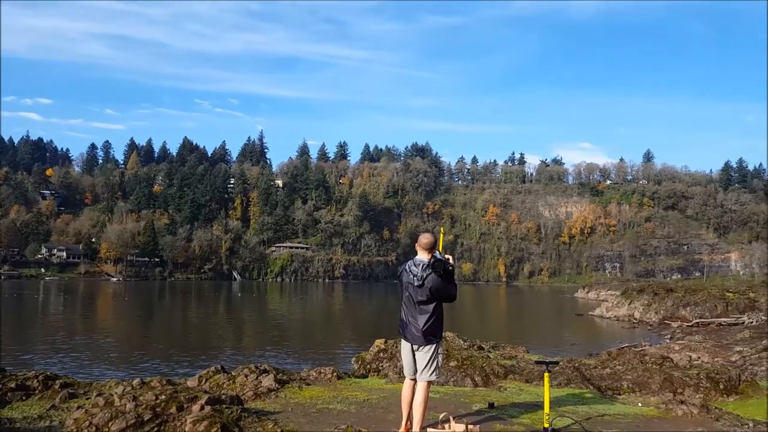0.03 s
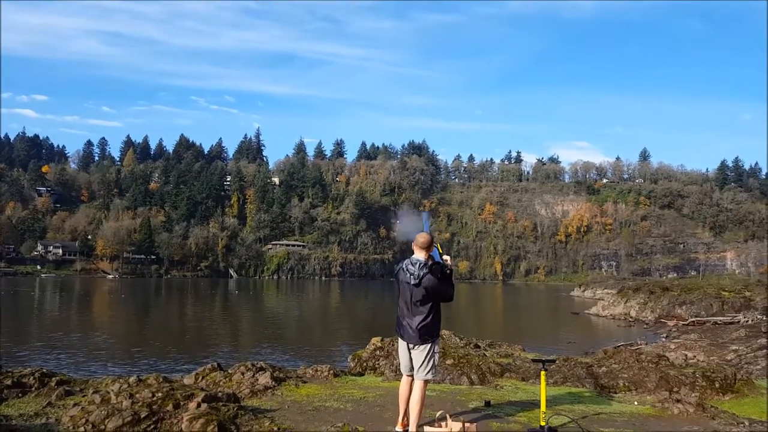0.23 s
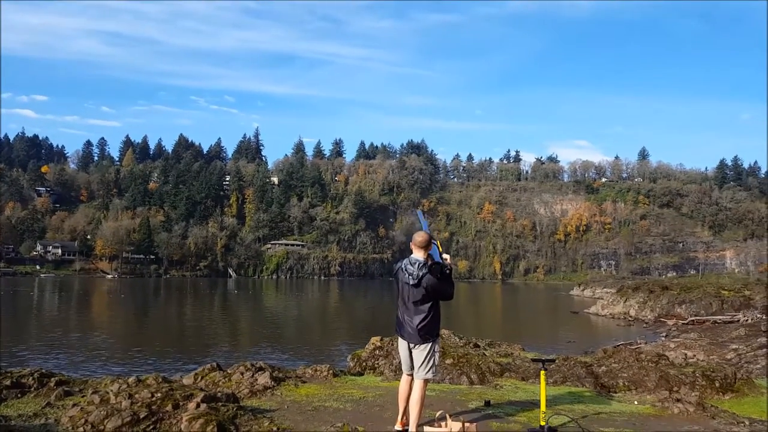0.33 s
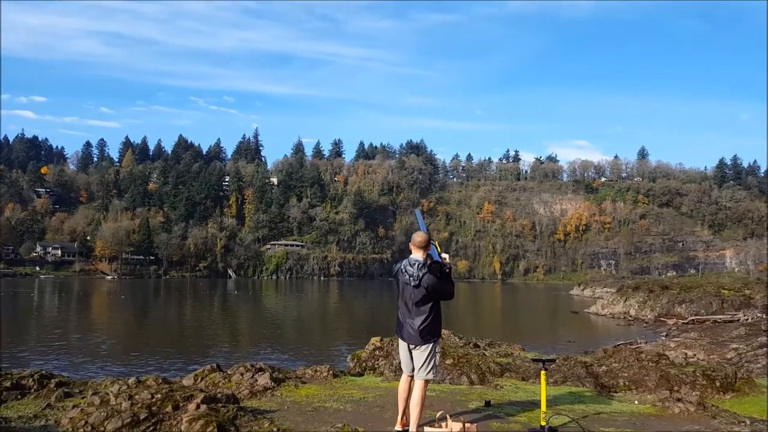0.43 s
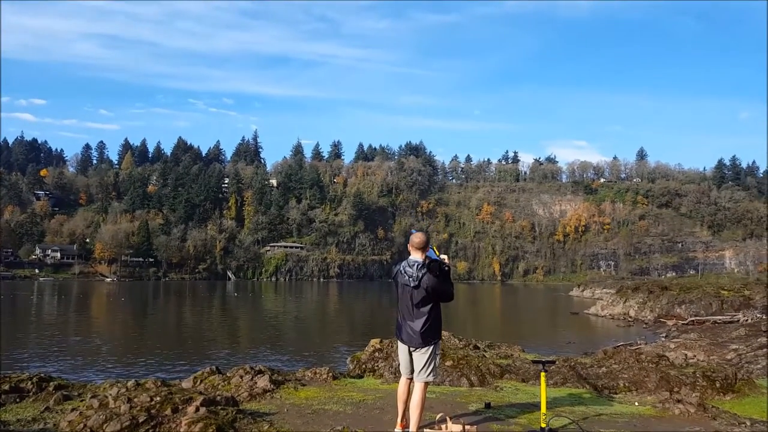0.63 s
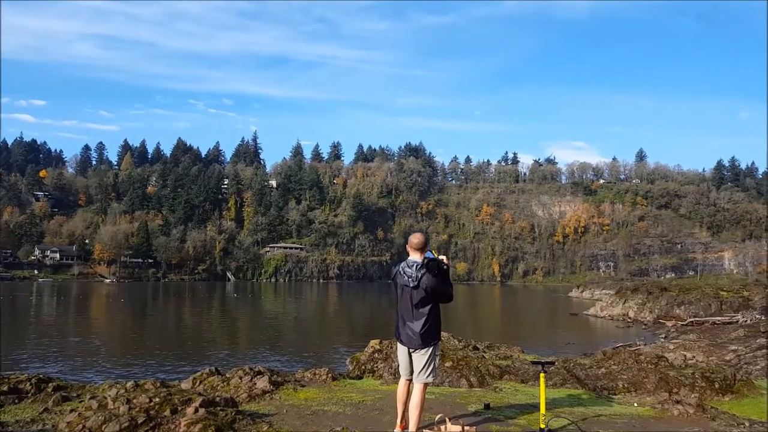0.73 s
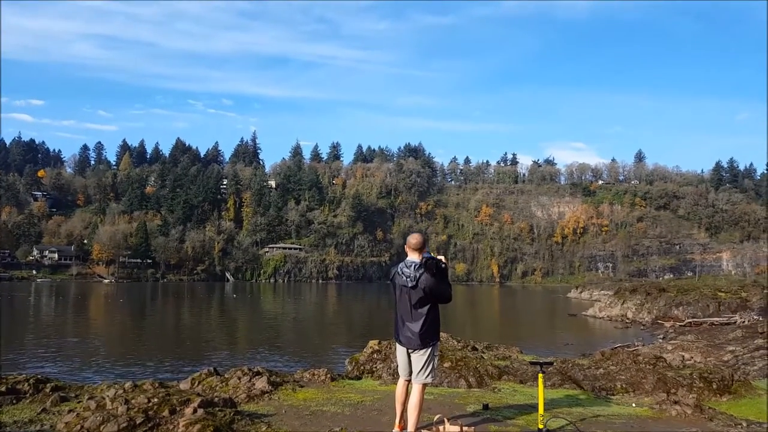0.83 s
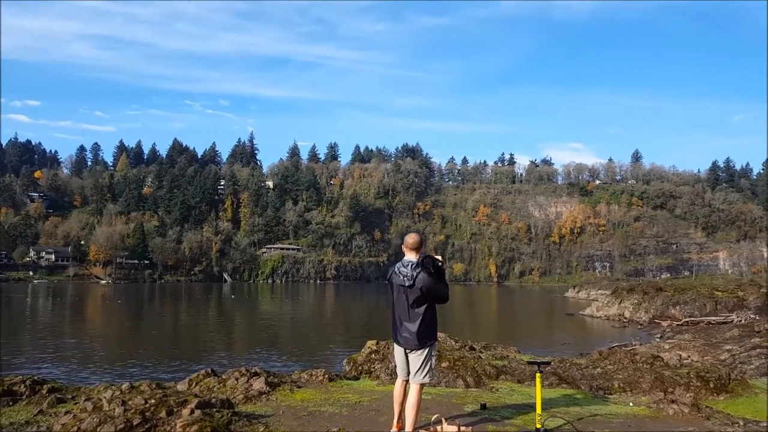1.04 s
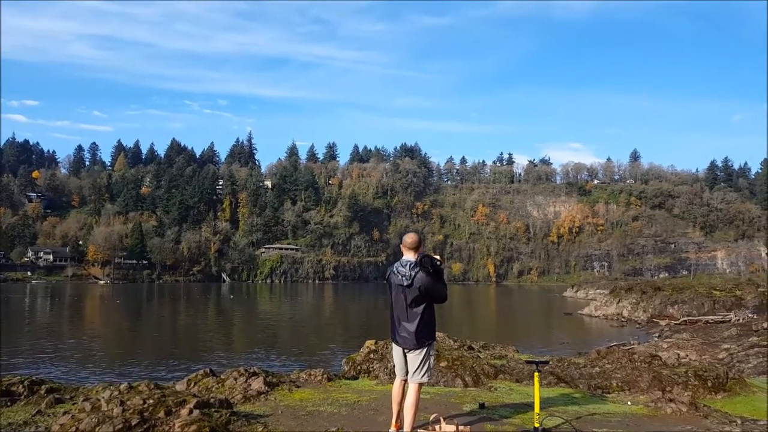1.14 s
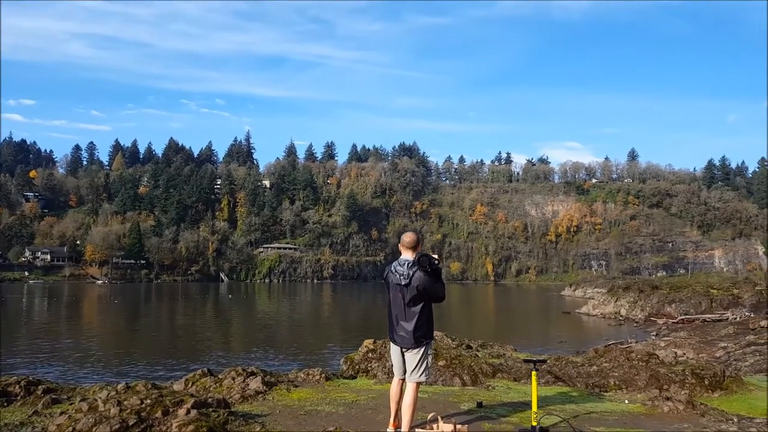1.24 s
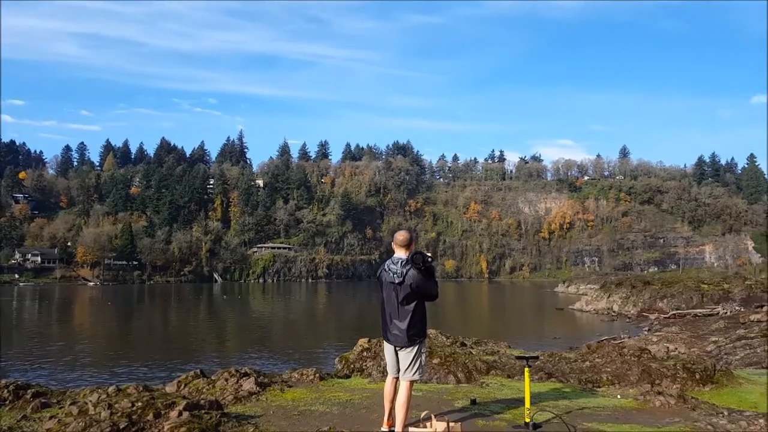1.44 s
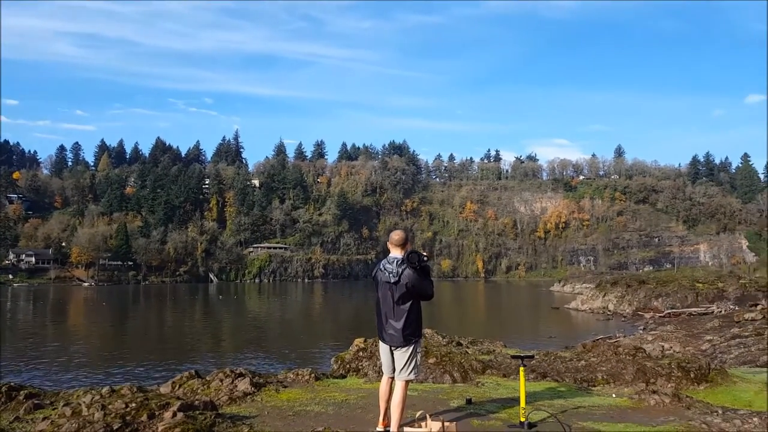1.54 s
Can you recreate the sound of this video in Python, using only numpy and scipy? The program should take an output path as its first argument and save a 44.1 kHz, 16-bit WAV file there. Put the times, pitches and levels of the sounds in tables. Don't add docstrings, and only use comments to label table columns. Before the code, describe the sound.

A compressed-air cannon fires a few metres away on a riverbank: plastic valve clack, tiny rising hiss, loud hollow pop and air surge, then tree echoes and a late woody knock from the far bank, phone microphone.

```python
import sys
import numpy as np
from scipy import signal
from scipy.fft import rfft, irfft
from scipy.io import wavfile
from scipy.ndimage import uniform_filter1d

SR = 44100
rng = np.random.default_rng(int(sys.argv[2]) if len(sys.argv) > 2 else 0)


def int16_out(signal):
    q = np.round(np.clip(np.atleast_2d(signal).T, -1, 1) * 32767)
    wavfile.write(sys.argv[1], SR, q.astype(np.int16))


def decibels_to_gain(level_db):
    exponent = np.asarray(level_db, float) / 20
    return 10 ** exponent


N = 70560
t = np.arange(N) / SR
POP_S = 0.2555


def level(x, db):
    return x * decibels_to_gain(db) / np.sqrt(np.mean(x ** 2))


def noise():
    return rng.standard_normal(N)


def colour(x, table, scale=1):
    hz, db = np.array(table, float).T
    size = 4096
    bins_hz = np.arange(size // 2 + 1) * SR / size
    bins_db = np.interp(np.log(bins_hz + 1), np.log(hz + 1), db)
    cepstrum = irfft(np.log(decibels_to_gain(scale * bins_db)))
    cepstrum[1:size // 2] *= 2
    cepstrum[size // 2 + 1:] = 0
    impulse = irfft(np.exp(rfft(cepstrum)))
    return signal.fftconvolve(np.r_[x[-size:], x], impulse)[size:size + N]


def ring(x, hz, width_hz):
    lead = 4096
    b, a = signal.iirpeak(min(hz, 0.45 * SR), hz / max(width_hz, 5), SR)
    return signal.lfilter(b, a, np.r_[x[-lead:], x])[lead:]


def ring_twice(x, hz, width_hz):
    return ring(ring(x, hz, width_hz), hz, width_hz)


def body(x, peaks, flip=-1):
    return sum(flip ** k * decibels_to_gain(db) * ring(x, hz, w) for k, (hz, w, db) in enumerate(peaks))


def swell(peak_s, rise_s, fall_s):
    return np.exp(np.where(t < peak_s, (t - peak_s) / rise_s, (peak_s - t) / fall_s))


def pulse(peak_s, width_s):
    return np.exp(-((t - peak_s) / width_s) ** 2)


def walk(rate_hz):
    k = int(SR / rate_hz)
    steps = np.repeat(rng.standard_normal(N // k + 1), k)
    return 1.146 * uniform_filter1d(uniform_filter1d(steps, k), k)[:N]


# f/Hz, level/dB per Hz
AIR_SPECTRUM = [(25, -19.5), (75, 1), (200, -6), (420, -18.5), (800, -22.5), (1300, -24), (2700, -32),
                (4400, -49.5), (12000, -58.5)]
# f/Hz, width/Hz, level/dB
AIR_DRONES = [(655, 45, -59), (12000, 150, -94)]


def air():
    gust_db, flicker_db = 0.6, 3.5
    gust = walk(0.86)
    base = colour(noise(), AIR_SPECTRUM)
    wind = 0
    for hz in 30 * 2 ** np.arange(0, 9.1, 0.5):
        flicker = walk(12.24) * (hz / 100) ** -0.2
        wind = wind + ring(base, hz, hz / 2.1) * decibels_to_gain(gust_db * gust + flicker_db * flicker)
    out = level(wind, -45)
    for hz, width_hz, db in AIR_DRONES:
        out = out + level(ring(noise(), hz, width_hz) * decibels_to_gain(1.5 * walk(5.74)), db)
    return out


def far(x):
    return signal.sosfilt(signal.butter(8, 4600, fs=SR, output="sos"), x)


# f/Hz, width/Hz, level/dB
SLAP_MODES = [(674, 88, -0.5), (1035, 38, 8), (1400, 150, -2.5), (2040, 240, -8.5), (2630, 37, -4),
              (3070, 83, -9), (3650, 63, -10), (4160, 110, -19.5)]


def slap():
    slap_s, gap_s, knock_width_s = 1.2725, 0.0032, 0.00004
    knocks = pulse(slap_s, knock_width_s) + pulse(slap_s + gap_s, knock_width_s)
    haze = decibels_to_gain(-19) * noise() * swell(slap_s, rise_s=0.0025, fall_s=0.005)
    out = far(body(knocks + haze, SLAP_MODES))
    return out * decibels_to_gain(-26.5) / np.abs(out).max()


def bank_wash():
    wash = level(ring(ring(noise(), 1020, 180), 1020, 680), -49)
    return wash * swell(1.33, rise_s=0.037, fall_s=0.44 / np.log(1000))


# f/Hz, level/dB per Hz
TAIL_SPECTRUM = [(88, -29.5), (150, -12), (209, 0.5), (285, -14.5), (860, -12), (1130, -19), (2500, -16.5),
                 (2920, -23.5), (15500, -39.5)]


def tree_tail():
    low_t60_s, treble_t60_s, top_t60_s = 1.29, 1.485, 0.84
    scatter = level(colour(noise() * decibels_to_gain(1.8 * walk(70)), TAIL_SPECTRUM), -29)

    def below(hz):
        return signal.sosfiltfilt(signal.butter(2, hz, fs=SR, output="sos"), scatter)

    def fade(t60_s):
        return swell(POP_S, 0.0015, t60_s / np.log(1000))

    low, mid = below(4000), below(9500)
    return low * fade(low_t60_s) + (mid - low) * fade(treble_t60_s) + (scatter - mid) * fade(top_t60_s)


# t/s, level/dB, f/Hz, width/Hz, smear/s
LONE_ECHOES = [(0.371, -38.5, 2420, 1520, .012), (0.47, -39, 2430, 618, 0.023),
               (0.472, -34.5, 205, 155, 0.035), (0.494, -46, 2460, 500, 0.021),
               (0.582, -40.5, 2130, 1210, 0.013), (.665, -44, 400, 296, 0.01),
               (.835, -62, 8000, 8000, 0.018), (1.101, -52, 2850, 2380, .005),
               (1.118, -54, 2300, 2000, .005), (1.165, -59.5, 2450, 1480, 0.041),
               (.465, -56.5, 9000, 9000, .02), (1.31, -60, 2780, 2930, 0.065),
               (1.394, -45, 1000, 706, 0.0062)]


def lone_echoes():
    far_s = 1.05
    out = 0
    for s, db, hz, width_hz, smear_s in LONE_ECHOES:
        echo = ring_twice(noise(), hz, width_hz)
        if s > far_s:
            echo = far(echo)
        out = out + level(echo, db) * swell(s, smear_s / 5, smear_s)
    return out


# f/Hz, width/Hz, level/dB
VALVE_MODES = [(292, 120, 2), (540, 200, -9), (780, 200, -5.5), (1000, 100, -9), (1270, 120, -0.5),
               (1283, 220, 4.5), (1897, 110, 2), (2430, 230, -2), (2980, 220, -1.5), (4200, 250, -9),
               (5400, 640, -14)]


def valve():
    valve_s = 0.1963
    rattle = level(body(noise() * decibels_to_gain(1.8 * walk(1500)), VALVE_MODES), -18.5)
    tick = level(ring(noise(), 10000, 9000), -33)
    return rattle * swell(valve_s, 0.0004, 0.013) + tick * swell(valve_s, 0.00037, 0.0015)


# f/Hz, level/dB per Hz
HISS_SPECTRUM = [(1470, -24), (2500, -1.5), (6740, 5), (9370, 2.5), (10100, -25.5), (13000, -11),
                 (15500, -21)]


def hiss():
    start_s, stop_s = 0.205, 0.241
    start_hz, stop_hz = 4026, 8940
    run = np.clip((t - start_s) / (stop_s - start_s), 0, 1)
    hz = start_hz + (stop_hz - start_hz) * run
    squeal = level(ring(noise(), 300, 900) * np.sin(2 * np.pi * np.cumsum(hz) / SR), -46.5)
    leak = level(colour(noise(), HISS_SPECTRUM), -31.5)
    return (leak + squeal) * run ** 0.9 * swell(stop_s, np.inf, 0.0062)


def spray():
    jet = level(ring(noise(), 8000, 9200), -29) * swell(POP_S, 0.00025, 0.018)
    shove = level(ring_twice(noise(), 76, 47), -25.5)
    return jet + shove * pulse(POP_S + 0.02, 0.055)


# f/Hz, level/dB per Hz
GUSH_SPECTRUM = [(24, -25), (40, -15), (417, -5.5), (591, -13), (686, -5), (2010, -13), (2640, -9.5),
                 (3470, -17), (15500, -51.5)]


def gush():
    opened = np.clip((t - 0.214) / 0.0033, 0, 1)
    rough = level(colour(noise(), GUSH_SPECTRUM) * decibels_to_gain(2.3 * walk(250)), -17)
    thump = level(ring(noise(), 216.7, 128), -23.5)
    return opened * (rough * swell(POP_S, 0.015, 0.033) + thump * swell(POP_S, 0.055, 0.079))


# f/Hz, width/Hz, level/dB
BARREL_MODES = [(200, 54, -21.5), (450, 110, -7), (645, 84, -10.5), (1000, 93, -4), (1257, 280, -14.5),
                (1715, 250, -6.5), (2270, 430, -6.5), (2620, 200, -3), (3030, 83, -23.5), (4120, 240, -4),
                (8870, 600, -26.5)]
# t/s, level/dB, crack/dB
MUZZLE_FRONTS = [(.2547, -5, -24), (.2559, -1, -12), (.2579, -6, -18), (.2609, -3, -24), (.2677, -8, -20),
                 (.2699, -11, -20), (.2762, -9, -22), (.2787, -12, -26), (.2960, -18, -24)]


def muzzle():
    front_s, step_s, crack_fall_s = 0.00024, 0.0001, 0.00067
    steps, waves, cracks = 0, 0, 0
    for s, db, crack_db in MUZZLE_FRONTS:
        u = (t - s) / front_s - 0.7
        steps = steps + decibels_to_gain(db) * pulse(s, step_s)
        waves = waves - 1.36 * decibels_to_gain(db) * u * np.exp(-u ** 2)
        cracks = cracks + decibels_to_gain(db + crack_db) * swell(s, 0.0001, crack_fall_s)
    unit = np.abs(body(pulse(POP_S, step_s), BARREL_MODES, 0.85)).max()
    ringing = decibels_to_gain(-3) * body(steps, BARREL_MODES, 0.96) / unit
    crack = level(ring(ring(noise(), 8000, 6570), 8000, 6574), 0) * cracks
    return waves + ringing + crack


def bank():
    background = air() + slap() + bank_wash() + tree_tail() + lone_echoes()
    return background + valve() + hiss() + spray() + gush() + muzzle()


# f/Hz, level/dB
SIDE_OVER_MID = [(25, -19), (200, -16), (500, -13), (1000, -12), (2000, -3), (4400, 1), (8000, 0),
                 (15000, 1)]
# f/Hz, level/dB
LEFT_OVER_RIGHT = [(60, -0.5), (300, -2), (700, 0.5), (1300, -1), (2400, -8.5), (4400, -1.5), (8000, -3.5),
                   (15000, -0.5)]


def scene():
    port_lag_s = 0.0003
    mid = bank()
    side = colour(np.roll(bank(), int(port_lag_s * SR)), SIDE_OVER_MID)
    left = colour(mid, LEFT_OVER_RIGHT, 0.59) + side
    right = colour(mid, LEFT_OVER_RIGHT, -0.64) - side
    return np.array([left, right])


def roll_off(x):
    return signal.sosfilt(signal.butter(12, 15950, fs=SR, output="sos"), x)


def record(dry):
    lag_s, attack_s, hold_s = 0.04, 0.037, 0.47
    duck_db, recover_db_per_s = -9, 19
    ceiling, top_hz = 1.05, 15950
    since_s = t - t[np.abs(dry).max(0).argmax()] - lag_s
    ducked_db = duck_db * np.clip(since_s / attack_s, 0, 1)
    recovered_db = recover_db_per_s * np.maximum(since_s - hold_s, 0)
    gain_db = np.minimum(ducked_db + recovered_db, 0)
    x = ceiling * np.tanh(dry * decibels_to_gain(gain_db) / ceiling)
    x = signal.sosfilt(signal.ellip(8, 0.2, 70, top_hz, fs=SR, output="sos"), x)
    return roll_off(x)


dry = scene()
out = record(dry)
int16_out(out)
```